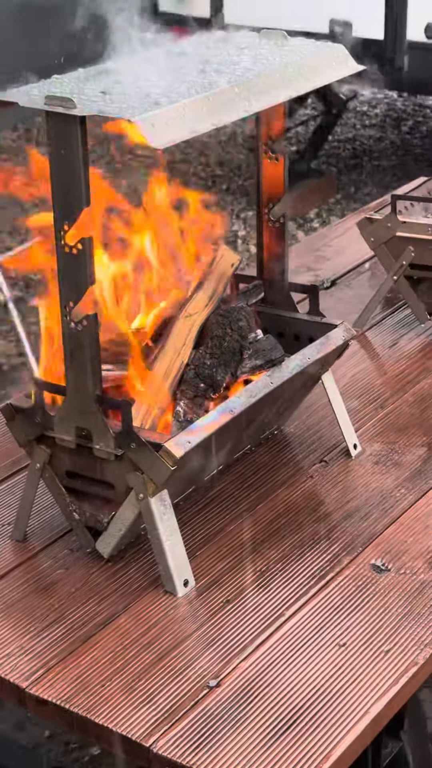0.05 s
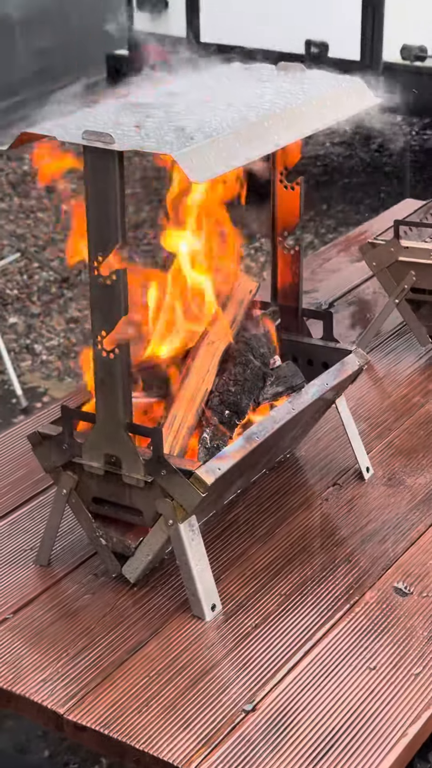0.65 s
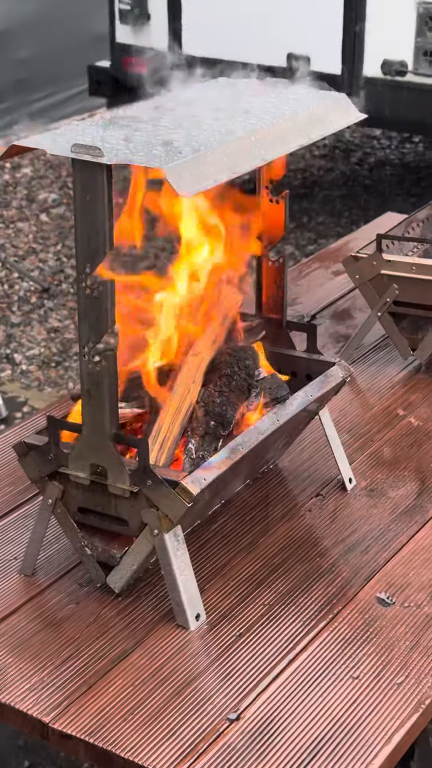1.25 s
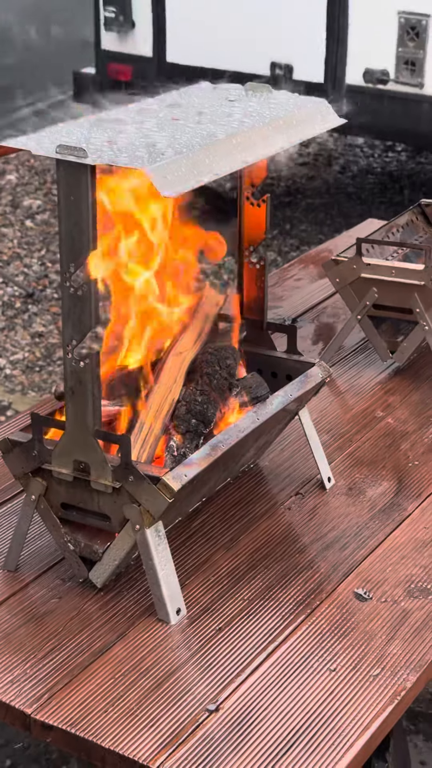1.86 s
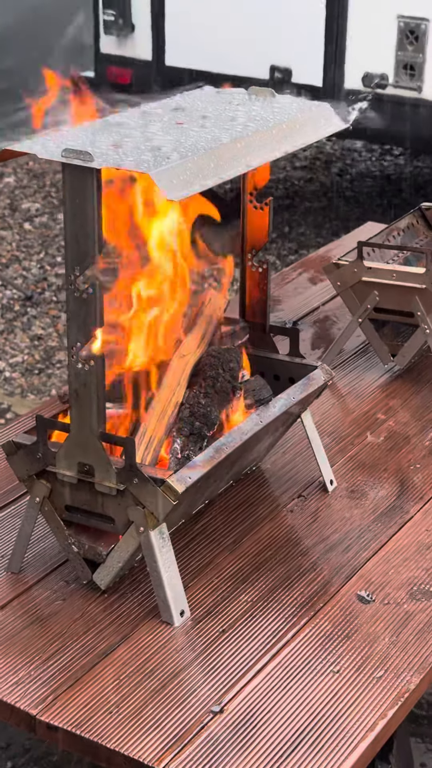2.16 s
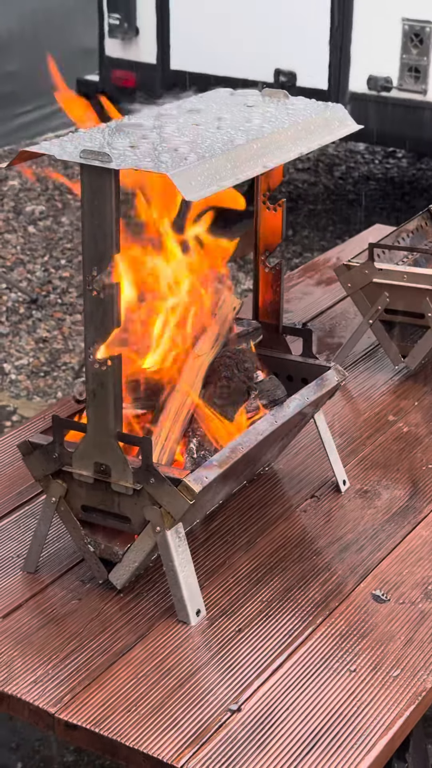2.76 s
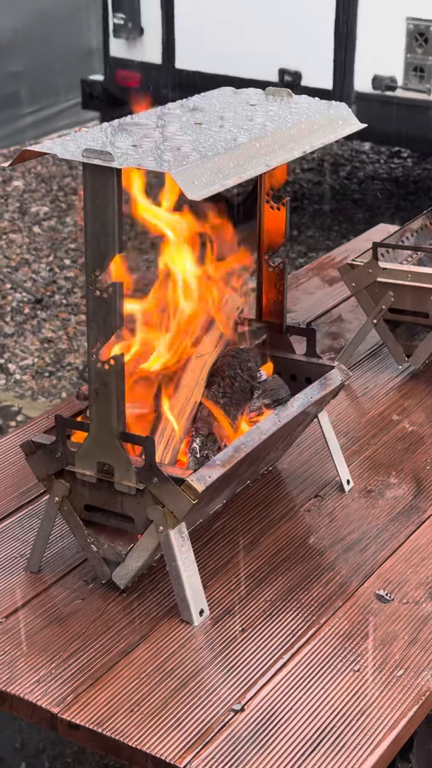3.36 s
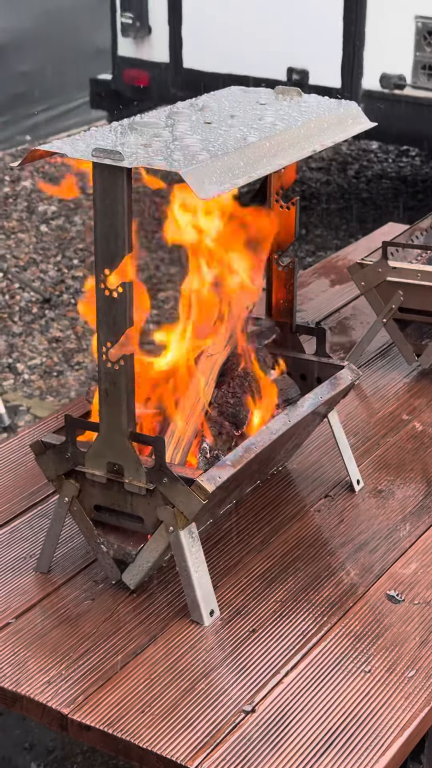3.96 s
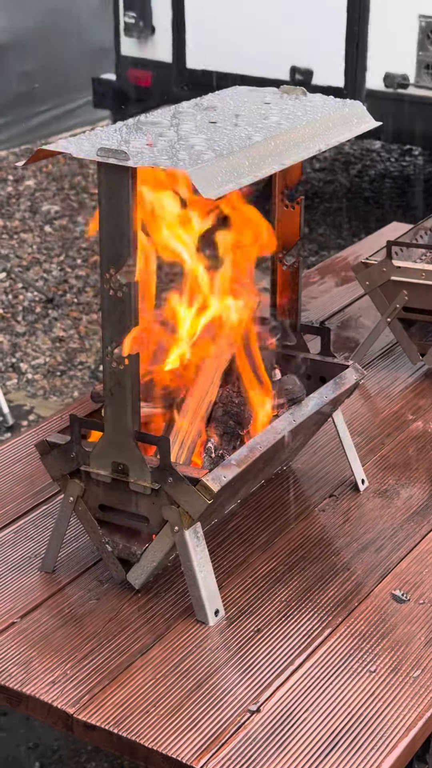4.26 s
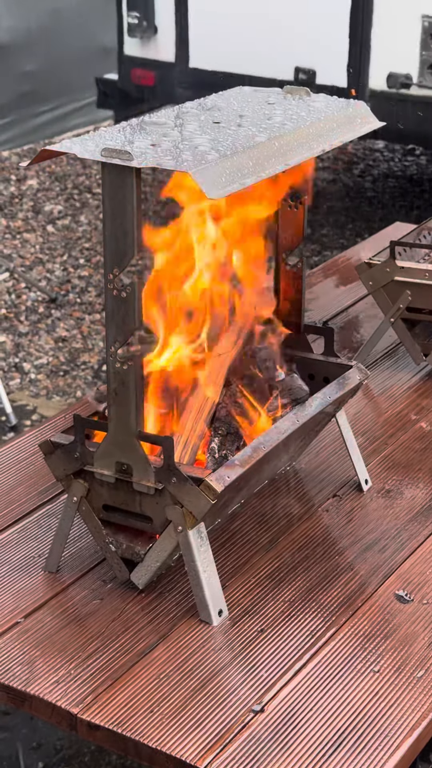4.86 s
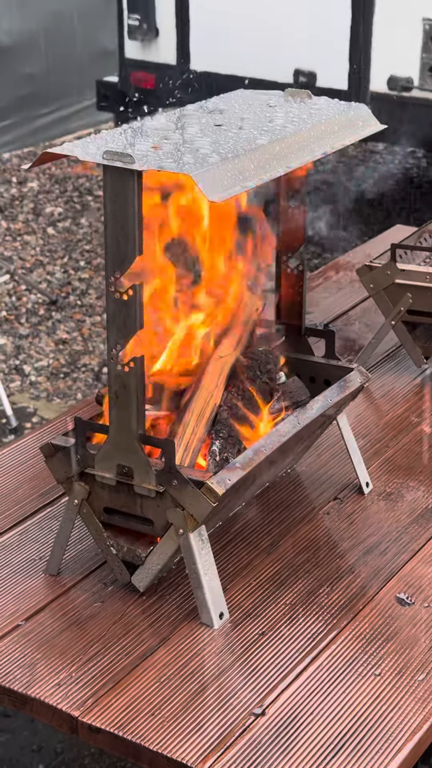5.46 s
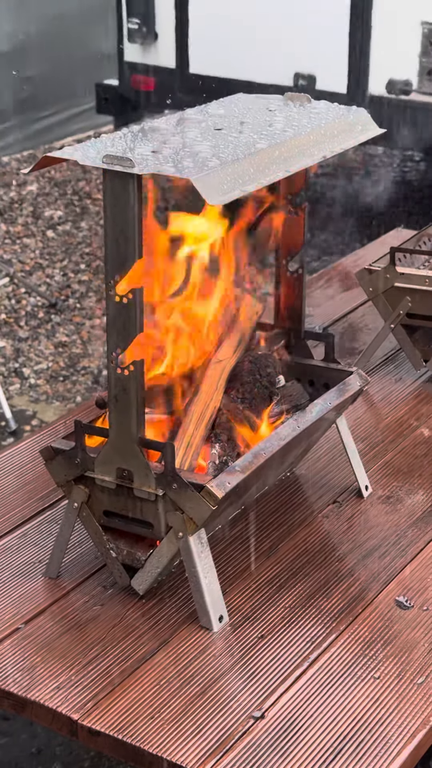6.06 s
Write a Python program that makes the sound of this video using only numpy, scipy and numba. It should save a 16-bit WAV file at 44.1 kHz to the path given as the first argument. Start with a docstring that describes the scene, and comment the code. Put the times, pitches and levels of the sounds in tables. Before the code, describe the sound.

Raindrops slap wet boards and spit on a hot stove lid outdoors, over a wash of rain and faintly rumbling flames.

```python
"""Steady rain patters on a wooden deck while drops sizzle on the hot metal cover of a small wood stove.
Near drops slap, click and splash on the boards; on the cover they tick, spit and boil away.
Behind them are a wash of rain further off and the faint rumble of the flames. The shower swells at the
start and near the end. A phone hears it with two microphones, the right one a little nearer the stove."""
import sys
import numpy as np
from scipy import signal
from scipy.fft import rfft, irfft, next_fast_len
from scipy.io import wavfile
from scipy.ndimage import uniform_filter1d
from numba import njit

SR = 44100
rng = np.random.default_rng(int(sys.argv[2]) if len(sys.argv) > 2 else 0)


def to_wav(s):
    """Save 16-bit WAV."""
    ch = np.atleast_2d(s).T  # columns
    pcm = np.round(np.clip(ch, -1, 1) * 32767)  # PCM
    wavfile.write(sys.argv[1], SR, pcm.astype(np.int16))


N = 273861
TIME = np.arange(N) / SR
LEFTWARD = np.array([[1], [-1]])  # adds on the left, takes away on the right
STOVE_LAG_S, STOVE_LAG_SPREAD_S = 44e-6, 3e-6  # the stove's sound reaches the left side later


# tone of the wet boards: f/Hz, level/dB
BOARD_TONE = [(60, 3), (150, 0.5), (300, -0.5), (700, -4), (1100, -2.5), (1700, 2.5), (2600, 2),
              (5000, -1.5), (16000, -22)]
def deck(shower_db):
    """Drops slap the wet boards from every side, each a short blip of falling pitch."""
    t, size, hz, direction = random_drops(count=12000, low_hz=162, high_hz=3710, spread_db=2.5)
    patter = blips(t, size * np.sqrt(hz), hz, cycles=2.4, glide=-0.14, lag=0.02 * direction / hz)
    return set_level(colour(patter, BOARD_TONE), -5) * undb(shower_db)


# fat drops on the nearest boards: t/s, slap level/dB, splash level/dB, splash f/Hz
NEAR_DROPS = [(.02, -27, -38, 2360), (.074, -27, -44, 1790), (0.166, -33, -41, 1500),
              (.313, -26, -38, 1500), (.435, -28, -39, 1900), (0.553, -26, -38, 2100),
              (.612, -25, -37.5, 1490), (.745, -29, -35, 1880), (.838, -36, -36, 2040),
              (1.104, -25, -35.5, 1500), (1.336, -29, -45, 2800), (1.601, -34, -40, 2700),
              (1.636, -26, -39, 1900), (1.712, -25, -37.5, 1500), (1.812, -24, -41, 1700),
              (1.95, -28, -35, 1110), (2.032, -25, -38, 1890), (2.111, -27, -38, 1800),
              (2.743, -21, -33, 1500), (3.16, -28, -38, 1600), (3.356, -26, -42, 2300),
              (3.699, -23, -45, 3040), (3.991, -22, -41, 2610), (4.39, -27, -39, 1200),
              (4.63, -23, -41, 1900), (4.686, -22, -39, 2200), (5.24, -29, -35, 1510),
              (5.35, -25, -38, 1200), (5.55, -22, -34, 1880), (5.65, -24, -38, 1700),
              (5.73, -25, -39, 1500), (5.8, -29, -35, 2200), (5.878, -22, -39, 2000),
              (5.964, -27, -35, 1700), (6.066, -19, -38, 2200)]
def fat_drops():
    """A big drop slaps a wet board to the left or right; the board thuds and water splashes."""
    t, slap_db, splash_db, splash_hz = np.transpose(NEAR_DROPS)
    detune, direction = rng.standard_normal((len(t), 2)).T
    pitch_ratio = 2 ** (.23 * detune)
    slap_hz, thud_hz = 940 * pitch_ratio, 330 * pitch_ratio
    lag = .3 / slap_hz * np.sign(direction)
    slap = blips(t, undb(slap_db), slap_hz, cycles=2.2, glide=-0.13, lag=lag)
    thud = blips(t, undb(slap_db - 7), thud_hz, cycles=3.05)
    return slap + thud + spray(t, splash_db, splash_hz, length_s=.022, count=45, octaves=1)


# drops that land on bare wood: t/s, level/dB, f/Hz
BARE_WOOD_DROPS = [(0.2023, -19, 6400), (0.4416, -23, 4400), (0.5318, -21, 4000), (0.7304, -22, 5000),
                   (0.8421, -17.5, 3800), (0.8536, -18, 3000), (0.863, -19, 2400), (0.942, -19, 6140),
                   (1.177, -22, 4500), (1.2985, -20.5, 4900), (1.3374, -18.5, 3900), (1.53, -24, 5800),
                   (1.5805, -18, 4600), (1.5887, -16.5, 4600), (1.6, -21, 3000), (1.6023, -20, 5700),
                   (1.7007, -18, 3800), (1.717, -24, 5500), (1.869, -23, 3800), (2.033, -24, 3200),
                   (2.451, -18, 4700), (2.775, -22, 4100), (3.002, -19.5, 3800), (3.1725, -23, 3000),
                   (3.2218, -24, 4600), (3.23, -21, 4400), (3.239, -23, 4200), (3.272, -22, 5000),
                   (3.3528, -21, 4000), (3.3653, -18.5, 3500), (3.5583, -17, 5700), (3.6941, -19, 4600),
                   (3.7003, -21, 3800), (3.9949, -20, 4200), (4.0127, -15, 4600), (4.233, -19, 5000),
                   (4.5095, -19, 6500), (4.5173, -22, 4300), (4.526, -18, 4300), (4.5427, -18, 4000),
                   (4.631, -15, 4300), (4.6842, -23, 4400), (4.8693, -14.5, 4570), (5.0154, -23, 4800),
                   (5.0255, -16.5, 4400), (5.1602, -20, 5500), (5.2698, -22, 4600), (5.3902, -18, 3900),
                   (5.812, -25, 3400), (5.883, -21, 3800), (5.9366, -21, 4800)]
def pats():
    """A drop smacks on bare wood: one dry click and a pinch of spray."""
    t, db, hz = np.transpose(BARE_WOOD_DROPS)
    click = blips(t, undb(db), hz, cycles=1.25)
    return click + spray(t, db - 15, hz, length_s=.0025, count=30, octaves=0.97)


def spatter(swell_db):
    """Small drops splash on the boards at random, louder as the shower swells."""
    t, size, hz, _ = random_drops(count=60, low_hz=1560, high_hz=6500, spread_db=0.6)
    splashes = spray(t, -44 + 20 * np.log10(size), hz, length_s=.014, count=60, octaves=0.63)
    return splashes * undb(swell_db / 2)


# tone of the water boiling on the cover: f/Hz, level/dB
BOILING_TONE = [(1000, -18), (3000, -10), (4000, -8), (5000, -5), (6000, 0), (7000, 2.8), (8000, 3.2),
                (9500, 2.6), (10800, 6), (11800, 6), (13000, 6), (14500, 8.8), (16000, 9)]
def sizzle(swell_db):
    """Tiny steam bubbles burst on the wet cover; fresh droplets prickle and boil away in puffs."""
    t, size, hz, direction = random_drops(count=50000, low_hz=2540, high_hz=22700, spread_db=-1.5)
    fizz = blips(t, size * np.sqrt(hz), hz, cycles=3.77, lag=stove_lag(direction))
    t, size, hz, direction = random_drops(count=900, low_hz=2840, high_hz=14000, spread_db=3.5)
    prickle = blips(t, size * np.sqrt(hz), hz, cycles=1.37, lag=stove_lag(direction))
    t, size, hz, _ = random_drops(count=110, low_hz=5200, high_hz=13500, spread_db=1.6)
    puffs = spray(t, 20 * np.log10(size), hz, length_s=.035, count=90, octaves=.45)
    boiling = set_level(fizz, 0) + set_level(prickle, -6.5) + set_level(puffs, -10)
    waver_db = 0.15 * swell_db + .7 * wander(per_second=14)
    return set_level(colour(boiling, BOILING_TONE), -33.8) * undb(waver_db)


# the snap, crack, ring and dull tap in one tick: pitch ratio, level/dB, length/cycles
TICK_PARTS = [(1.9, -11, 4), (1.03, -0.5, 3.1), (0.76, -10, 4), (0.5, -13, 1.6)]
def ticks(t, db, hz):
    """A drop cracks on the hot metal, the sheet rings briefly, and a little spray follows."""
    lag = stove_lag(rng.standard_normal(len(t)))
    hit = sum(blips(t, undb(db + part_db), ratio * hz, cycles, lag=lag)
              for ratio, part_db, cycles in TICK_PARTS)
    return hit + spray(t, db - 29, 0.9 * hz, length_s=.01, count=120, octaves=1.4)


# the loudest drops on the hot cover: t/s, level/dB, f/Hz
LOUD_TICKS = [(0.0835, -26, 7400), (0.1682, -9, 10100), (0.394, -15, 7300), (0.863, -13, 7300),
              (1.007, -8.5, 7400), (1.0593, -6, 11200), (1.1244, -11, 13900), (1.3984, -17, 12100),
              (1.452, -10, 11000), (1.555, -10, 13200), (1.602, -12, 12300), (1.726, -14, 11200),
              (1.974, -13, 10300), (2.2984, -12, 10300), (2.411, -11, 7800), (2.7868, -15, 11400),
              (3.008, -9.5, 12000), (3.553, -15, 9700), (3.7004, -12, 11000), (4.0328, -10, 6500),
              (4.194, -11, 10700), (4.2339, -12, 12300), (4.4853, -6, 11000), (4.8601, -17, 7300),
              (4.8697, -14, 12000), (4.9796, -8.5, 12300), (5.1486, -5, 6700), (5.3193, -18, 7000),
              (5.3487, -13, 12800), (5.5517, -11, 7440), (5.688, -8, 11300), (5.8751, -9, 11100),
              (6.1378, -5, 14000), (6.1741, -5.5, 10400)]
def cover_drops():
    """Drops hit the hot cover: loud ticks, with fainter ones at random between them."""
    t, size, hz, _ = random_drops(count=26, low_hz=6682, high_hz=13364, spread_db=1.5)
    return ticks(*np.transpose(LOUD_TICKS)) + ticks(t, -23 + 20 * np.log10(size), hz)


# drops that boil away on the cover: t/s, level/dB, length/s, f/Hz, pitch scatter/octaves
SKITTERING_DROPS = [(0.054, -36, 0.12, 8400, 1.4), (0.06, -35, .035, 14500, .25),
                    (0.375, -41, .04, 6800, .7), (0.48, -40, 0.086, 7440, 0.56),
                    (0.663, -46, .04, 7800, .5), (1.071, -35, 0.019, 6330, 0.67),
                    (1.238, -40, 0.043, 7600, 0.62), (1.597, -30, .011, 5050, 0.94),
                    (1.714, -42, 0.014, 5800, 0.5), (2.433, -40, 0.041, 5600, 1.0),
                    (2.663, -36, 0.052, 7200, .7), (2.765, -56, 0.045, 6300, .7),
                    (3.171, -40, 0.13, 6540, 0.82), (3.465, -36, 0.058, 8400, .55),
                    (3.568, -47, 0.11, 8500, 0.63), (3.79, -39, 0.033, 7900, 0.45),
                    (4.235, -39.5, .05, 8500, 1.0), (4.311, -32.5, 0.01, 3300, 0.35),
                    (4.512, -32.5, .04, 6000, 1.3), (4.634, -37, 0.045, 6370, 0.5),
                    (4.719, -49, 0.1, 7850, .7), (5.154, -37, 0.037, 5200, .9),
                    (5.303, -35.5, .03, 7500, 0.5), (5.933, -34, 0.031, 6700, 0.51)]
def spits():
    """A drop breaks into many droplets that skitter over the hot metal."""
    t, db, length_s, hz, octaves = np.transpose(SKITTERING_DROPS)
    return spray(t, db, hz, length_s, count=300, octaves=octaves)


# tone of the distant rain: f/Hz, level/dB
FAR_RAIN_TONE = [(40, -34), (100, 1), (250, -3), (500, 2), (1000, 1), (1800, -4), (3500, -9), (6000, -10.5),
                 (10000, -26.5), (16000, -108)]
def far_rain(shower_db):
    """Countless drops on the gravel all around blur into a flickering wash, a touch louder on the left."""
    middle, side = rng.standard_normal((2, N))
    wash = colour(middle + (0.5 * side + 0.044 * middle) * LEFTWARD, FAR_RAIN_TONE)
    return set_level(wash, -1.2) * undb(shower_db + 0.08 * wander(per_second=16))


# two swells in the shower: peak t/s, rise/dB, half width/s
SHOWER_SWELLS = [(0.1, 2, 0.33), (5.75, 4.0, 1)]
def swell():
    """How far the shower rises above its steady level, in dB."""
    return sum(rise_db * np.exp(-((TIME - peak) / width) ** 2) for peak, rise_db, width in SHOWER_SWELLS)


# tone of the rain that a swell adds: f/Hz, level/dB
SWELL_TONE = [(1000, -1), (2000, 0), (3500, -3), (7000, -4.5)]
def extra_rain(shower, swell_db):
    """The added rain of a swell comes from further off, so it sounds duller."""
    return colour(shower * (undb(swell_db) - 1), SWELL_TONE)


# tone of the fire's rumble: f/Hz, level/dB
RUMBLE_TONE = [(20, -32), (35, -11), (52, 5.5), (68, 12), (85, 5), (130, 5), (300, -60.5)]
# tone of its roar: f/Hz, level/dB
ROAR_TONE = [(60, -42), (125, -6.5), (230, 4.5), (400, 6), (700, -4), (1500, -77)]
# how the roar rises and falls: t/s, level/dB
ROAR_LOUDNESS = [(0, -47), (.2, -42.5), (1.2, -46.5), (3.1, -44.5), (4.55, -44.5), (4.8, -46.5),
                 (4.92, -38), (5.2, -39), (5.7, -40), (6.2, -39)]
def flames():
    """The fire flutters low in the middle; a soft roar from the left grows towards the end."""
    rumble = colour(rng.standard_normal(N), RUMBLE_TONE) * undb(wander(per_second=23.76))
    roar = set_level(colour(rng.standard_normal(N), ROAR_TONE), 0)
    roar_db = np.interp(TIME, *np.transpose(ROAR_LOUDNESS))
    return set_level(rumble, -46.5) + roar * undb(roar_db) * (1 + .8 * LEFTWARD)


def random_drops(count, low_hz, high_hz, spread_db):
    """Random times, sizes, pitches and directions; a positive spread gives many small drops, few big."""
    when, weight, pitch, place = rng.random((count, 4)).T
    size = undb(-spread_db * np.log(.025 + weight))
    hz = low_hz * (high_hz / low_hz) ** pitch
    direction = np.sqrt(3) / np.pi * np.log(place / (1 - place))  # mostly near the middle
    return when * N / SR, size, hz, direction


def spray(t, db, hz, length_s, count, octaves):
    """A cloud of droplets follows each time t, scattered in pitch and gone after 1.5 lengths."""
    delay, up, down, weight = rng.random((len(t), count, 4)).transpose(2, 1, 0)
    when = t + 1.5 * length_s * (1 - np.sqrt(delay))
    pitch = hz * 2 ** (octaves * (up + down - 1))
    size = undb(db) * np.sqrt(pitch * length_s / count) * -np.log(1 - weight)
    return blips(when.ravel(), size.ravel(), pitch.ravel(), cycles=2.91, lag=STOVE_LAG_S)


def stove_lag(direction):
    """Seconds by which a sound on the cover reaches the left microphone after the right."""
    return STOVE_LAG_S + STOVE_LAG_SPREAD_S * direction


def blips(t, size, hz, cycles, glide=0, lag=0):
    """Very short tones, one at each time t; cycles and lag may be one value for all."""
    each = np.ones(len(t))
    hz = np.minimum(hz, .42 * SR)
    return ring(t * each, size * each, hz * each, cycles * each, float(glide), lag * each)


@njit
def ring(t, size, hz, cycles, glide, lag):
    """Each blip grows and dies in a few cycles; glide bends its pitch, and the left is lag s late."""
    out = np.zeros((2, N))
    for k in range(len(t)):
        life = cycles[k] / hz[k]
        for mic in range(2):
            start = t[k] + lag[k] * (.5 - mic)
            for i in range(max(int(start * SR) + 1, 0), min(int((start + 2 * life) * SR), N)):
                age = (i / SR - start) / life
                loudness = size[k] * 4 * age * np.exp(1 - 4 * age)
                turns = cycles[k] * (age - .25) * (1 + glide * (age - .25))
                out[mic, i] += loudness * np.cos(2 * np.pi * turns + k)
    return out


def undb(db):
    """Turn decibels into a number to multiply by."""
    return 10 ** (np.asarray(db) / 20)


def set_level(x, db):
    """Scale a sound to an average (rms) level."""
    return x * undb(db) / np.sqrt(np.mean(x ** 2))


def colour(x, tone):
    """Turn pitches up or down following a tone table."""
    hz, db = np.transpose(tone)
    size = next_fast_len(N + 4096)
    f = np.maximum(np.arange(size // 2 + 1) * SR / size, 1)
    gain = undb(np.interp(np.log(f), np.log(hz), db))
    return irfft(rfft(x, size) * gain, size)[..., :N]


def wander(per_second):
    """Slide from one random value to the next, typically about 1 away from zero."""
    hold = int(SR / per_second)
    steps = rng.standard_normal(1024)[np.arange(N) // hold % 1024]
    return set_level(uniform_filter1d(steps, hold), 0)


def scene():
    """Rain, stove and fire as they reach the two microphones."""
    shower_db, swell_db = -33, swell()
    wash = far_rain(shower_db)
    flurry_db = 0.97 * wander(per_second=10)  # near drops come in small flurries
    shower = wash + deck(shower_db + flurry_db)
    rain = shower + extra_rain(shower, swell_db) + fat_drops() + pats()
    stove = sizzle(swell_db) + spits() + cover_drops() + flames()
    return rain + stove + spatter(swell_db)


# the phone's treble lift: f/Hz, level/dB
TREBLE_LIFT = [(3000, 0), (5000, 2), (8000, 4.3), (9500, 4.5), (11000, 0)]
# how much the phone boosts or cuts the difference between left and right: f/Hz, level/dB
STEREO_WIDTH = [(100, -22), (250, -8.5), (400, -1), (700, 8.5), (1050, 7), (1250, 8.5), (1600, -4),
                (2100, -24), (4900, -24), (6000, -9), (6800, -6), (9500, -4), (10600, 0)]
def record(dry):
    """The phone lifts the treble, widens the low mids, centres bass and upper mids, and cuts the top."""
    left, right = colour(dry, TREBLE_LIFT)
    middle = (left + right) / 2
    side = colour((left - right) / 2, STEREO_WIDTH)
    low_pass = signal.ellip(10, .2, 70, 15700, fs=SR, output="sos")
    return signal.sosfilt(low_pass, np.array([middle + side, middle - side]))


dry = scene()
out = record(dry)
to_wav(out)
```